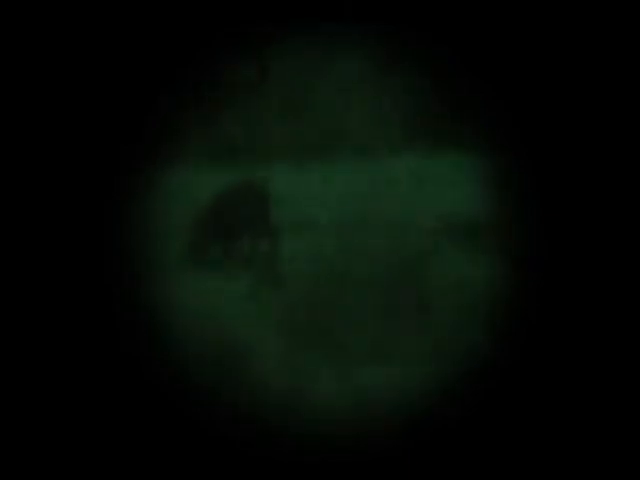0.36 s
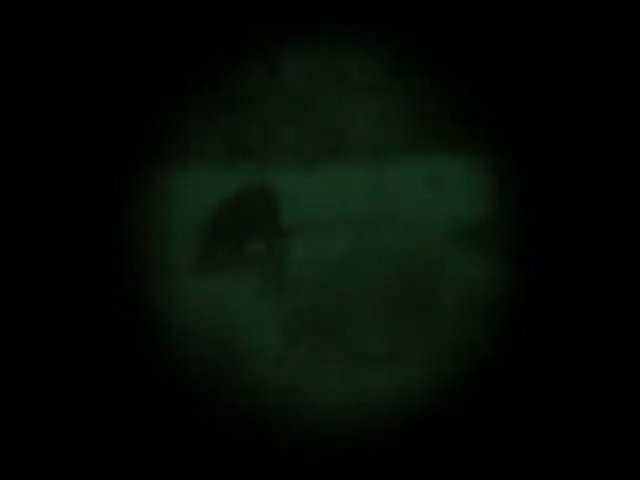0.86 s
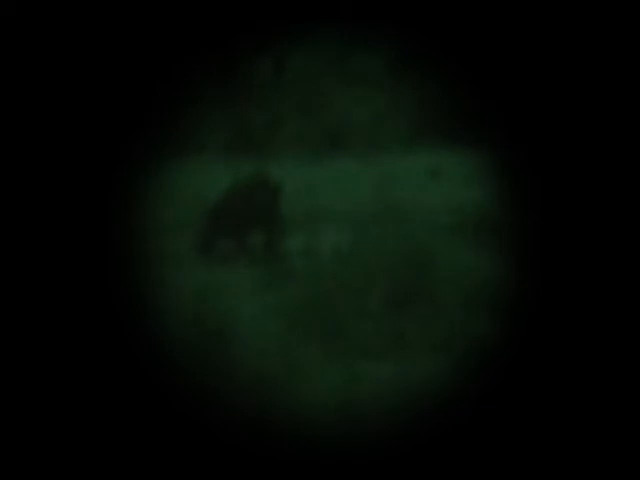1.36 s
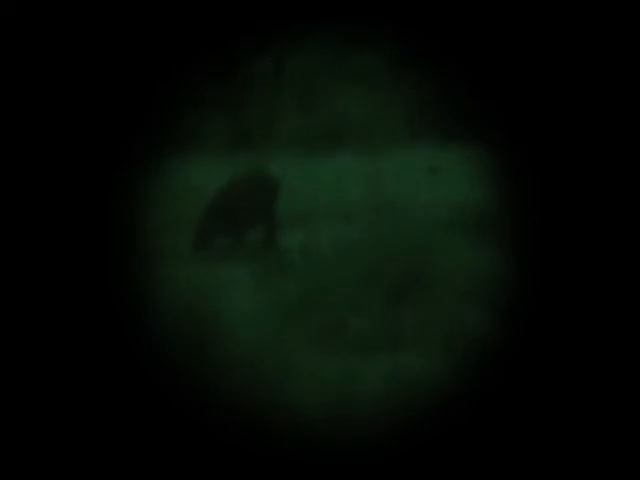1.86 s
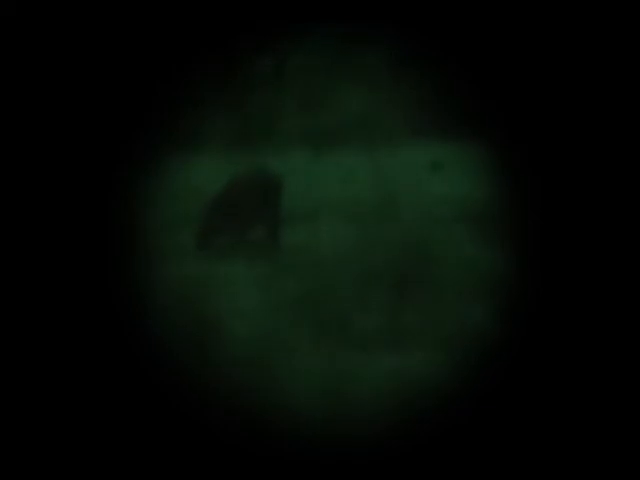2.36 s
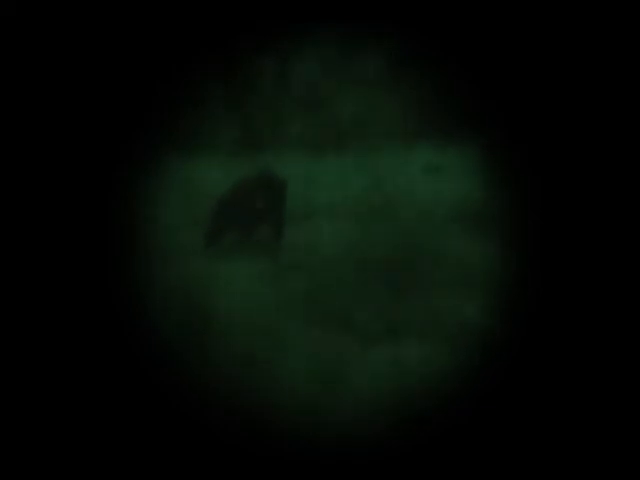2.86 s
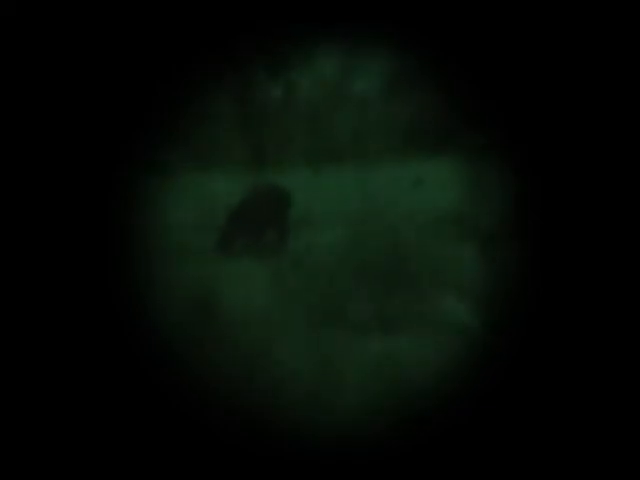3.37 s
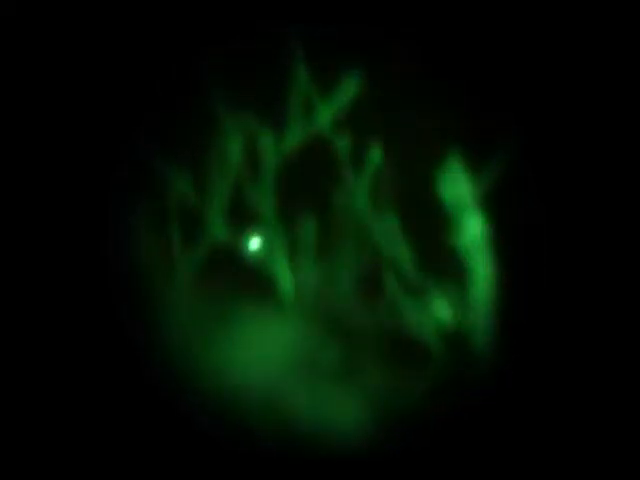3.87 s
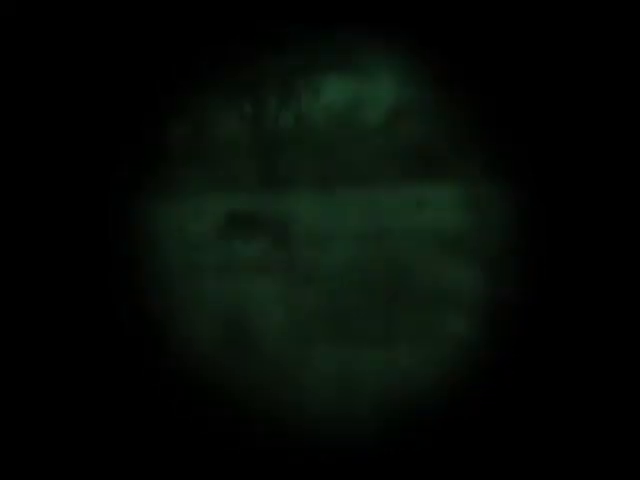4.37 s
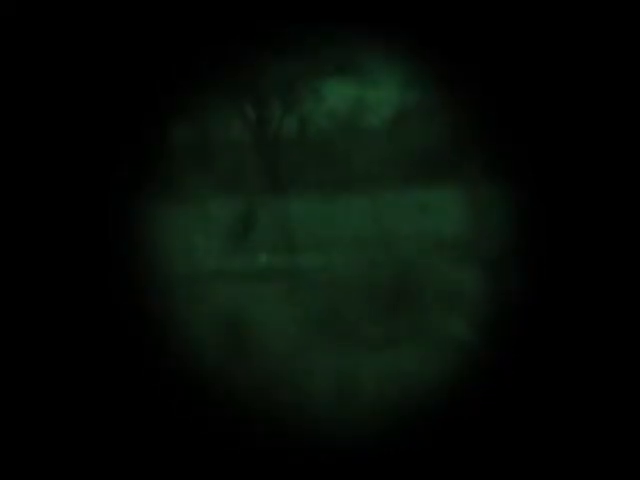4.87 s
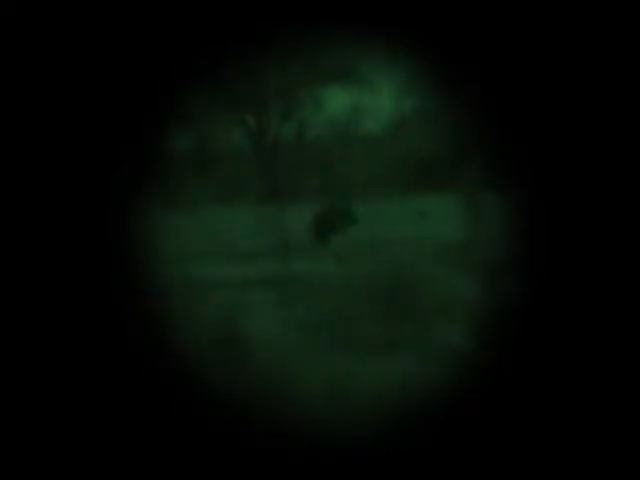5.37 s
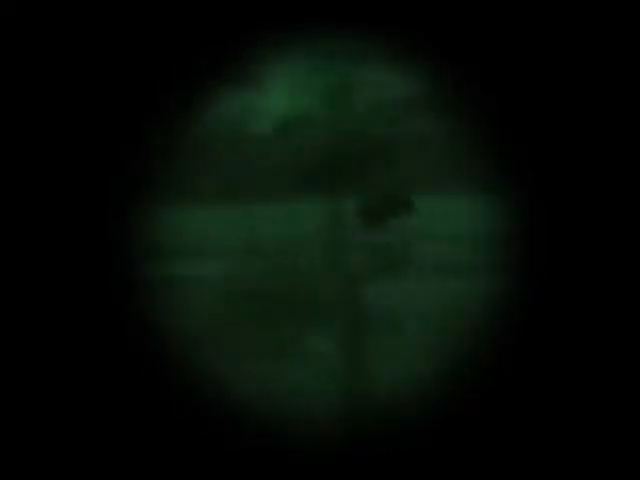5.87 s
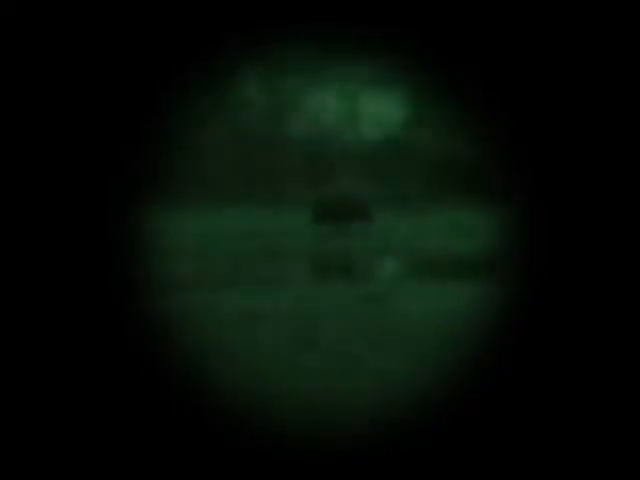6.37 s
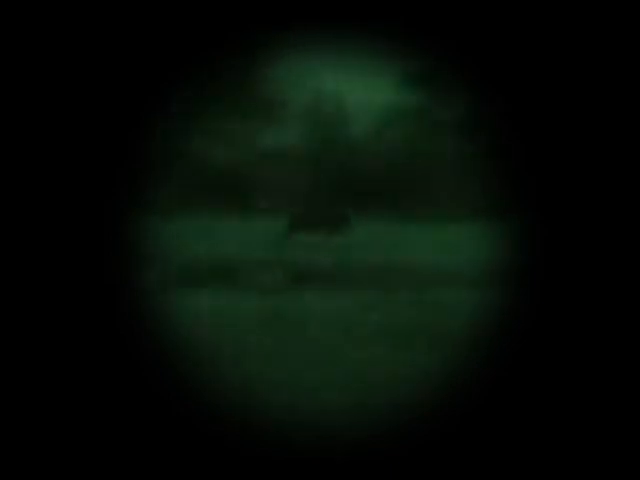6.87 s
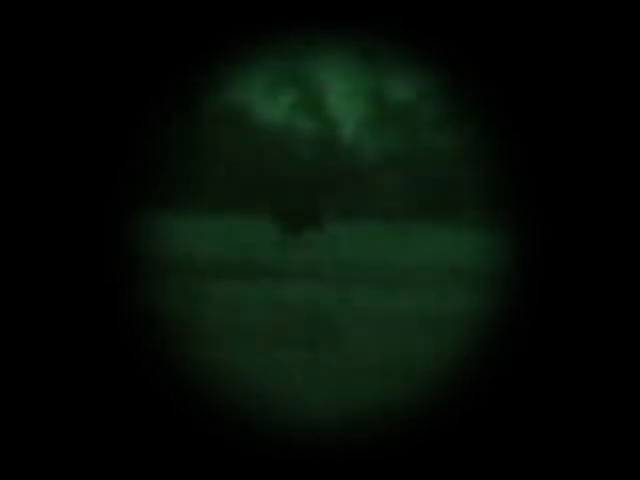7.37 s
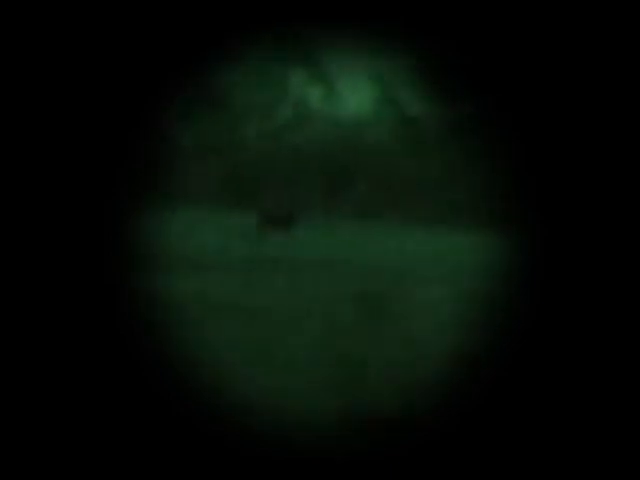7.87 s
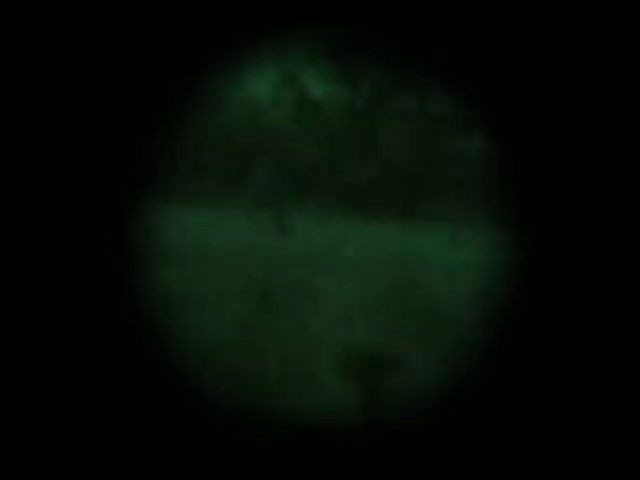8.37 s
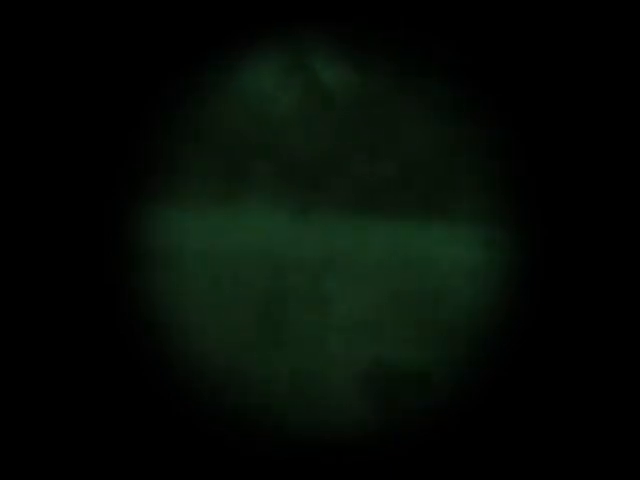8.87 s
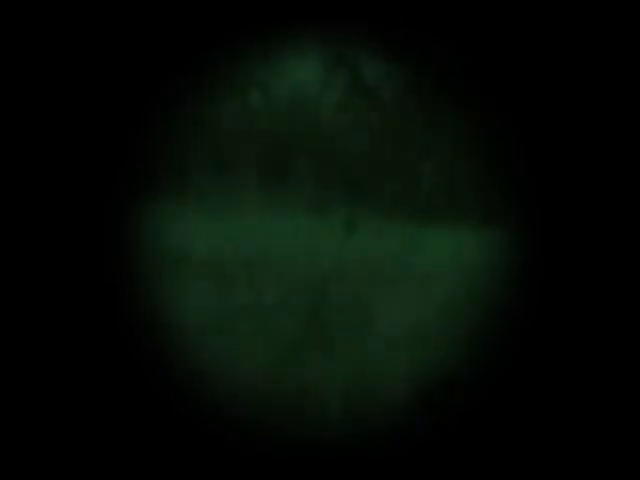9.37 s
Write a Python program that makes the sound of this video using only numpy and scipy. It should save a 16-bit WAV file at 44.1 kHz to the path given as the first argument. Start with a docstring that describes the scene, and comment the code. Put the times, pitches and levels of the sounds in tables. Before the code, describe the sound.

Outdoor field at night, heard on a hand-held stereo camera: faint hiss, chirping crickets, small plastic ticks of handling. At about 3.6 seconds a bow just to the right snaps loudly with a woody knock and brief rattle; a quarter second later the arrow smacks home. An animal bolts with quick rustles and thumps, fading within a second or so. Later come wind buffets, a hard click and a final scrape.

```python
"""Bow shot in a night field

A bow is loosed just right of a hand-held camera and the arrow lands a quarter second later: rung modes and air noise.
An animal bolts through the grass in bursts of grainy noise; two kinds of cricket sing in sagging tones.
The camera's shell ticks in the hand with short rung modes, and at the end a sleeve scrapes past and squeaks.
Wind buffets the two microphones as low noise, which also makes one hoof thud, over the steady hiss of the night."""
import sys
import numpy as np
from scipy import signal
from scipy.fft import rfft, irfft, next_fast_len
from scipy.io import wavfile
from scipy.ndimage import uniform_filter1d

SR = 44100
rng = np.random.default_rng(int(sys.argv[2]) if len(sys.argv) > 2 else 0)


def store_pcm(level_fs):
    """Save levels as 16-bit WAV."""
    pcm = np.round(np.clip(level_fs, -1, 1) * 32767).astype(np.int16)
    wavfile.write(sys.argv[1], SR, np.atleast_2d(pcm).T)


def amplitude_ratio(level_db):
    """Convert a level in decibels to the matching linear amplitude (field) ratio."""
    exponent = np.asarray(level_db, float) / 20
    return 10 ** exponent


N = 418509
TIME = np.arange(N) / SR
SIDES = np.array([[.5], [-.5]])  # shares a left-minus-right level between the two microphones


def curve(rows):
    """Columns of a timed table drawn out over all samples; silence outside it."""
    s, *columns = np.transpose(rows)
    return [np.interp(TIME, s, c, left=-120, right=-120) for c in columns]


def on_log(hz, rows):
    """A spectrum read on a log-frequency axis."""
    table_hz, value = np.array(rows)[:, :2].T
    return np.interp(np.log(hz), np.log(table_hz), value)


def colour(x, rows, pan=((1, 0), (2, 0)), alike=((1, 0), (2, 0))):
    """Shape two noises to a spectrum, balance and likeness; the mean of both sides gets rms 1."""
    size = next_fast_len(N)
    hz = np.maximum(np.arange(size // 2 + 1) * SR / size, 1)
    mid, side = rfft(x, size)
    likeness = np.clip(on_log(hz, alike), -.95, .95)
    pair = np.sqrt(1 + likeness) * mid + 2 * SIDES * np.sqrt(1 - likeness) * side
    gain = amplitude_ratio(on_log(hz, rows) + SIDES * on_log(hz, pan))
    y = irfft(pair * gain, size)[:, :N]
    return y / np.sqrt(np.mean(y.mean(0) ** 2))


def grit(spread_db, hold_s):
    """Two noises whose shared loudness varies from grain to grain, with smoothed steps."""
    hold = max(int(hold_s * SR), 1)
    grains = amplitude_ratio(spread_db * rng.standard_normal(N // hold + 1))
    loudness = uniform_filter1d(np.repeat(grains, hold), hold)[:N]
    return rng.standard_normal((2, N)) * loudness


def swells(times, peaks_db, rise_db_s, fall_db_s, under_db):
    """Gain of bursts that climb and die at steady dB rates, added in power to a level under them."""
    power = amplitude_ratio(2 * under_db)
    for s, db, up, down in np.broadcast(times, peaks_db, rise_db_s, fall_db_s):
        below_peak = np.where(TIME < s, up * (s - TIME), down * (TIME - s))
        power = power + amplitude_ratio(2 * (db - below_peak))
    return np.sqrt(power)


def add(out, s, sound):
    """Mix a sound in at a time."""
    i = min(max(int(s * SR), 0), N)
    out[:, i:i + sound.shape[1]] += sound[:, :N - i]


def ring(modes, scatter_db, twist, rise_s, centre_hz=500., slope_db=0.):
    """One blow at both microphones, peak 1: each hears the modes with its own strengths and phases."""
    hz, db, t60 = np.transpose(modes)[:, :, None]
    # the contact favours modes near its own pitch: slope_db is lost per octave away from it
    db = db - slope_db * np.abs(np.log2(hz / centre_hz))
    t = np.arange(int(t60.max() * SR) + 2) / SR
    pitch_luck, phase_luck, level_luck = rng.standard_normal((3, 2, len(modes), 1))
    detuned_hz = hz * (1 + 0.012 * pitch_luck[:1])  # the same at both microphones
    waves = np.sin(2 * np.pi * detuned_hz * t + twist * phase_luck)
    decay = 1000. ** (-t / t60)
    y = (amplitude_ratio(db + scatter_db * level_luck) * waves * decay).sum(1)
    y = y * (1 - np.exp(-t / rise_s))
    return y / np.abs(y).max(1, keepdims=True)


def blows(rows, crack, knock, twist, lag_s, rise_s, knock_left_db=0.):
    """A hard contact snaps and cracks; the body answers with a knock."""
    out = np.zeros((2, N))
    for s, crack_db, crack_hz, knock_db, knock_hz, pan in rows:
        # too short to have a pitch
        snap = [(crack_hz, 8., .002), (crack_hz * 1.44, 4., .002), (crack_hz / 1.49, 4., .004)]
        click = ring(crack + snap, 2.15, twist, 0.00019, crack_hz, slope_db=3.2)
        add(out, s, amplitude_ratio(crack_db + SIDES * pan) * click)
        thud = ring(knock, 3.5, twist / 2, rise_s, knock_hz, slope_db=9.)
        add(out, s + lag_s, amplitude_ratio(knock_db + SIDES * (pan + knock_left_db)) * thud)
    return out


# blows in the bow: start_s, crack_peak_db, crack_pitch_hz, knock_peak_db, knock_pitch_hz
BOW_BLOWS = [(3.631, -18.5, 4080, -52, 1010), (3.6368, -18.5, 2500, -35, 1050),
             (3.6417, -10.5, 4500, -34, 500), (3.6471, -16, 3900, -20.5, 420),
             (3.6498, -21, 2500, -20, 300), (3.7006, -39, 2700, -43, 400), (3.783, -48, 2500, -43, 640)]
# the slack cables rattle on: start_s, crack_peak_db
RATTLE = [(3.7142, -43), (3.7272, -35), (3.7402, -37), (3.7472, -34), (3.7603, -38), (3.7737, -46)]
# what the bow rings with, for cracks and for knocks: pitch_hz, level_db (relative), t60_s
BOW_CRACK = [(1710, -14, 0.014), (2200, -0.5, 0.016), (2490, -6, 0.033), (3060, -5.5, 0.017),
             (3610, -3, 0.018), (4200, -4, 0.014), (5120, 1, 0.012), (6230, -6.5, .018), (7500, -6.5, .012),
             (8780, -4.5, .015), (10800, -4.5, 0.014)]
BOW_KNOCK = [(160, 0, .1), (206, 9, 0.08), (250, 4, 0.065), (307, -5, .07), (385, 3, 0.1),
             (532, -13.5, 0.15), (700, 1, 0.07), (990, 9, 0.025), (1270, 10, 0.075), (1610, 0, .035),
             (2105, -2, .13)]


def bow():
    """Hard contacts in the bow crack and knock, then the slack cables rattle on its modes."""
    rattle = [(s, db, 2000, db - 18, 1800) for s, db in RATTLE]  # crack 2000 Hz, knock 1800 Hz
    rows = [row + (-6,) for row in BOW_BLOWS + rattle]  # 6 dB to the right
    return blows(rows, BOW_CRACK, BOW_KNOCK, twist=1.86, lag_s=-.0015, rise_s=0.0016, knock_left_db=-5.5)


def string_slap():
    """The string hits its stop with a whistle that shoots upward."""
    t = np.arange(int(.0028 * SR)) / SR
    pitch_hz = 3300 + 750000 * t + np.array([[300], [0]])  # left is 300 Hz higher
    turns = np.cumsum(pitch_hz).reshape(2, -1) / SR  # right carries on from the left's last phase
    whistle = np.sin(np.pi * t / t[-1]) * np.sin(2 * np.pi * turns)
    out = np.zeros((2, N))
    add(out, 3.641, amplitude_ratio(-13 + SIDES * -2) * whistle)
    return out


# air noise of the shot: time_s, level_db
SWISH = [(3.613, -53), (3.632, -36), (3.64, -40), (3.644, -27), (3.655, -31), (3.675, -44), (3.71, -51),
         (3.76, -55), (3.8, -65.5), (4.0, -64)]
# the arrow tears leaves: peak_s, level_db
THROUGH_LEAVES = [(3.945, -41.5)]
# its spectrum: pitch_hz, level_db (per Hz, relative)
SWISH_COLOUR = [(180, -22), (400, -12), (1240, -10), (2400, -12), (4900, -16), (8700, -16.5), (12500, -20),
                (14000, -66)]
# its balance: pitch_hz, left_minus_right_db
SWISH_PAN = [(60, -11.5), (110, -5), (200, -8), (360, -11), (650, 7), (1190, -16), (2160, -20),
             (3920, -10.5), (7130, -1.5), (13000, -3)]


def swish():
    """Rough air noise that carries the shot's tail and bursts where the arrow tears leaves."""
    tear_s, tear_db = np.transpose(THROUGH_LEAVES)
    gain = swells(tear_s, tear_db, 1200., 600., curve(SWISH)[0])
    return gain * colour(grit(2.1, 0.0023), SWISH_COLOUR, SWISH_PAN)


# blows of the arrow landing: start_s, crack_peak_db, crack_pitch_hz, knock_peak_db, knock_pitch_hz
ARROW_BLOWS = [(3.9174, -23, 7500, -31, 704), (3.9319, -32, 3280, -22, 270),
               (3.9416, -27.5, 3620, -32, 400)]
# what the landing rings with, for cracks and for knocks: pitch_hz, level_db (relative), t60_s
ARROW_CRACK = [(1910, 2, 0.017), (2500, -5, 0.017), (3180, -2, 0.014), (4000, -2, .011), (5600, -2, 0.009),
               (7200, 2, 0.0041), (9700, 6, 0.0077), (11500, -8, 0.0057)]
ARROW_KNOCK = [(191, -12, 0.11), (270, 1.5, 0.049), (380, -3.5, 0.022), (566, -6, 0.028), (790, 2.5, 0.021),
               (1303, 1.5, 0.037)]


def arrow_landing():
    """The arrow lands in a few hard blows, each a bright crack with a short knock."""
    rows = [row + (-4,) for row in ARROW_BLOWS]  # 4 dB to the right
    return blows(rows, ARROW_CRACK, ARROW_KNOCK, twist=0.42, lag_s=0., rise_s=0.00054)


# the animal's steady brushing: time_s, stalks_db, hooves_db
BOLT = [(3.99, -65, -66), (4.15, -61, -59.5), (4.56, -61, -62.5), (4.62, -63, -72), (4.75, -59, -69),
        (4.95, -64.5, -74), (5.15, -65, -72), (5.3, -75, -75), (5.5, -77, -72)]
# its bounds in the grass: peak_s, stalks_db, hooves_db, hollow_ring_db
BOUNDS = [(4.065, -62, -60, -70), (4.1, -57, -54, -52), (4.124, -57, -56, -51), (4.15, -58, -58, -59),
          (4.21, -60, -60, -55), (4.257, -63, -51, -60), (4.295, -61, -51, -58), (4.34, -64, -57, -68),
          (4.452, -49, -50, -56), (4.49, -55.5, -59.5, -66), (4.53, -58, -56, -68), (4.84, -62, -62, -70),
          (5.04, -68, -70, -75)]
# spectra of stalks, hooves and the narrow ring in the thumps: pitch_hz, level_db (per Hz, relative)
STALKS = [(700, -23), (1200, -4), (2000, -4), (3200, -5.5), (5000, -11.5), (8000, -17), (12500, -24),
          (14000, -57)]
HOOVES = [(120, -9), (250, 2), (420, 1), (600, -2), (950, -5), (1300, -9), (2000, -30)]
HOLLOW = [(700, -30), (900, -4), (980, 0), (1080, -4), (1400, -30)]
# balance of the animal: pitch_hz, left_minus_right_db
BOLT_PAN = [(150, -15.5), (400, -9), (1200, -5), (7000, -3)]
# dry stalks snap: start_s, peak_db
TWIGS = [(4.0615, -49), (4.1465, -49), (4.188, -41), (4.443, -43), (4.516, -47)]
# what a snapping stalk rings with: pitch_hz, level_db (relative), t60_s
TWIG = [(2000, -6, .012), (2700, 0, .02), (3170, 0, .02), (4600, -5, .01), (7000, -8, .006)]


def bolt():
    """Stalks crackle finely and snap, hooves thump in coarser lumps with a hollow ring; bounds burst in all."""
    s, *peaks_db = np.transpose(BOUNDS)
    stalks_db, hooves_db = curve(BOLT)
    unders_db = (stalks_db, hooves_db, hooves_db - 7.)
    stalks, hooves, hollow = (swells(s, db, 600, 300, under) for db, under in zip(peaks_db, unders_db))
    out = stalks * colour(grit(3.8, .002), STALKS, BOLT_PAN, NIGHT_ALIKE)
    out = out + hooves * colour(grit(4.5, .01), HOOVES, BOLT_PAN, NIGHT_ALIKE)
    out = out + hollow * colour(grit(3., .008), HOLLOW, BOLT_PAN, NIGHT_ALIKE)
    for when, db in TWIGS:
        add(out, when, amplitude_ratio(db + SIDES * -4) * ring(TWIG, 3., .6, .0004))
    return out


# the shell ticks in the hand: start_s, crack_peak_db, crack_pitch_hz, knock_peak_db, left_minus_right_db
SHELL_TICKS = [(0.116, -57, 3400, -41, 0), (0.35, -63, 4200, -47, 3), (0.7056, -60, 3900, -42, 3),
               (1.057, -64, 3700, -48.5, -2.5), (1.5942, -31, 7000, -32.5, -1),
               (1.671, -21, 8000, -63, 1.5), (1.779, -36, 6570, -60, -4.5), (2.069, -59, 3400, -44, 5),
               (2.5476, -64, 4560, -50.5, 8), (2.808, -64, 4000, -50, 3), (1.225, -64, 4000, -52, 1.5),
               (1.971, -64, 4000, -51, 4), (3.283, -64, 4000, -52, 3), (0.8, -64, 4000, -50, 3),
               (5.8652, -35.5, 6550, -48, 2), (5.9606, -40.5, 6440, -66, 0.4), (6.0932, -45, 8500, -57, 4),
               (6.2385, -50, 8000, -66, 0), (6.333, -47, 9000, -66, -1.5), (6.3625, -50, 8000, -66, -2),
               (6.4325, -43, 6100, -63, 0.2), (6.6194, -38.5, 2400, -43, -9), (6.8771, -43, 8040, -65, 0),
               (7.093, -49, 8000, -65, 0), (7.2622, -58, 3610, -48, -2), (7.4048, -57, 3200, -46, -1),
               (7.551, -15.5, 8500, -23, 2.5), (7.7866, -31.5, 6700, -33.5, 0),
               (8.1903, -56, 3700, -46, 7.9), (8.329, -54, 3800, -46, 0), (8.4267, -42, 2760, -36, 0),
               (8.5374, -63, 4000, -49, -1), (9.1563, -24.5, 6300, -29.5, -1.5),
               (9.2383, -32, 4940, -45, -3.8), (9.2886, -33, 5000, -58, -2), (9.3245, -36, 3100, -58, -2),
               (9.3456, -37, 7000, -33, -4.5), (9.4302, -40, 6400, -54.3, 0)]
# what the shell rings with, for cracks and for knocks: pitch_hz, level_db (relative), t60_s
SHELL_CRACK = [(2200, -5, 0.011), (2920, -6, 0.013), (3500, -9, 0.012), (3880, -10, 0.01),
               (4600, -10, 0.01), (7850, -2, 0.007), (8200, -6, 0.01), (9700, -3.5, 0.01),
               (11570, -8, 0.0077)]
SHELL_KNOCK = [(249, -3, 0.025), (347, -2, 0.022), (455, -1, 0.024), (601, 5, 0.013), (758, 4.5, 0.017),
               (1050, 1.5, 0.021), (1394, 1, 0.018), (1820, 2, 0.016)]


def shell_ticks():
    """The shell cracks and knocks; the harder the crack against the knock, the higher the knock."""
    rows = []
    for s, crack_db, crack_hz, knock_db, pan in SHELL_TICKS:
        knock_hz = 640 * 2 ** (.035 * (crack_db - knock_db))  # octaves per dB
        rows.append((s, crack_db, crack_hz, knock_db, knock_hz, pan))
    return blows(rows, SHELL_CRACK, SHELL_KNOCK, twist=1.0, lag_s=0.00046, rise_s=0.0011)


def fumbling(count):
    """Fingers shift on the shell: soft knocks at random moments."""
    out = np.zeros((2, N))
    for when, size, side in rng.random((count, 3)):
        gain = amplitude_ratio(-58.5 + 7.0 * size + SIDES * 12 * (side - 0.33))
        add(out, when * N / SR, gain * ring(SHELL_KNOCK, 4.6, 0.88, 0.0023, 366.0, slope_db=13.0))
    return out


# the drag: time_s, scrape_db, low_squeak_db
SLEEVE = [(9.19, -72, -67), (9.25, -62, -58), (9.37, -62, -56), (9.43, -61, -66), (9.5, -58, -60)]
# the cloth catches: peak_s, scrape_db, low_squeak_db, high_squeak_db
CATCHES = [(9.239, -47, -49, -46), (9.289, -53, -56, -57), (9.318, -55, -50, -62), (9.325, -57, -42, -56),
           (9.342, -58, -55, -65), (9.367, -60, -54, -53), (9.388, -58, -64, -62)]
# spectrum of the scrape: pitch_hz, level_db (per Hz, relative)
SLEEVE_SCRAPE = [(1500, -20), (2500, -8), (4900, -3), (7000, -4), (9000, -14), (12500, -28), (14000, -50)]
# squeaks, a low pair then a high pair: pitch_hz, width_hz (of one filter pass), level_db (within the pair)
SLEEVE_RINGS = [(2890, 430, 1), (3260, 350, 2.5), (4500, 300, -8), (4860, 230, -4)]


def sleeve():
    """Stiff cloth scrapes broadly; where it catches, it squeaks in a low and a high pair of narrow rings."""
    s, *peaks_db = np.transpose(CATCHES)
    scrape_db, squeak_db = curve(SLEEVE)
    unders_db = (scrape_db, squeak_db, squeak_db - 9.)
    scrape_gain, *squeak_gains = (swells(s, db, 5000, 500, under) for db, under in zip(peaks_db, unders_db))
    slips = grit(2.4, .003)
    out = scrape_gain * colour(grit(3., 0.002), SLEEVE_SCRAPE)
    for gain, pair in zip(squeak_gains, np.reshape(SLEEVE_RINGS, (2, 2, -1))):
        squeak = 0
        for hz, width, db in pair:
            b, a = signal.iirpeak(hz, hz / width, SR)
            once = signal.lfilter(b, a, slips)
            squeak = squeak + amplitude_ratio(db) * signal.lfilter(b, a, once)
        out = out + gain * squeak / np.sqrt(np.mean(squeak.mean(0) ** 2))
    return amplitude_ratio(SIDES * -3) * out


def stroke(hz, fall_hz, length_s, rough):
    """One wing stroke: a tone that sags as the wing slows, blurred by the grass."""
    u = np.linspace(0, 1, int(length_s * SR))
    blur = uniform_filter1d(rng.standard_normal((2, len(u))), 90) * np.sqrt(90) * rough
    phase = 2 * np.pi * np.cumsum(hz + fall_hz * (.3 - u ** 2)) / SR
    right_shift = 1.6 * rng.random((2, 1)) * [[0], [1]]
    return np.sin(np.pi * u) * (1 + blur) * np.sin(phase + right_shift + blur[::-1])


# two-stroke chirps: start_s (of the first stroke, 0.02 s late), gap_s, level_db, pitch_hz
LOW_CRICKETS = [(0.19, 0.053, -58, 3880), (0.364, .06, -69, 4000), (0.64, .058, -64.5, 3740),
                (0.794, .057, -66, 3970), (1.093, .046, -60.5, 3920), (1.193, 0.065, -64.5, 3860),
                (1.385, .058, -65, 3800), (1.3, .05, -66, 3950), (3.176, .11, -65, 4050),
                (1.918, .046, -56.5, 3900), (2.285, .05, -68, 3760), (2.377, 0.052, -62, 4080),
                (2.717, 0.061, -64.5, 3830), (3.026, 0.058, -63, 3880), (3.228, .062, -65, 3820),
                (3.463, .058, -61.5, 3820), (4.24, .06, -62, 3950), (4.639, .04, -60, 4000),
                (4.84, .06, -62, 3900), (5.042, .055, -65, 3850), (5.242, .057, -58.5, 4010),
                (5.518, .043, -55.5, 4000), (5.712, 0.065, -60, 3790), (5.958, 0.054, -65, 3940),
                (6.293, .059, -65, 3740), (6.466, .063, -55.5, 3830), (6.579, .046, -61, 3970),
                (6.745, .06, -61.5, 3900), (6.971, .06, -69, 3800), (7.45, .06, -54, 3765),
                (7.564, .052, -62.5, 3800), (7.93, .058, -65, 3960), (8.157, 0.045, -63, 3930),
                (8.269, .061, -54, 3780), (8.385, .058, -68, 4020), (0.905, .06, -68, 3980),
                (8.635, .05, -66, 3950), (8.045, .057, -64, 3900), (7.33, .055, -65, 3960),
                (6.85, .055, -67, 3900), (8.722, 0.053, -61.5, 3910), (9.09, .056, -57, 3770)]


def low_crickets(count):
    """Slow two-stroke chirps near 4 kHz over a fainter chorus at random moments."""
    out = np.zeros((2, N))
    for s, gap, db, hz in LOW_CRICKETS:
        pan = -3 - 4 * (hz < 3830) * (s > 6)  # the deeper singer ends up further right
        for k in range(2):  # the second stroke is 1 dB louder
            add(out, s + k * gap - .02, amplitude_ratio(db + k + SIDES * pan) * stroke(hz, 493.0, .037, rough=0.38))
    for when, pitch, size in rng.random((count, 3)):
        gain = amplitude_ratio(-75 + 5. * size + SIDES * -6)
        for k in range(2):
            chirp = stroke(3750 + 300 * pitch, 375.0, .04, rough=0.51)
            add(out, when * N / SR + .055 * k, gain * chirp)
    return out


# trills: middle_s
HIGH_CRICKET = [0.067, 0.364, 0.686, 0.954, 1.238, 1.56, 1.882, 2.161, 2.487, 2.765, 3.085, 3.381, 5.12,
                5.499, 5.8, 6.09, 6.38, 6.653, 6.9, 7.195, 7.46, 7.69, 7.96, 8.257, 8.563, 8.856, 9.12]
# how the trills change as the camera swings: time_s, level_db, left_minus_right_db, pitch_hz, trill_length_s
HIGH_CRICKET_PAN = [(0, -69.5, -5, 5220, .1), (5.5, -70, -5, 5240, .09), (6.5, -70, -5, 5260, .1),
                    (7.2, -72, 0, 5300, .12), (7.8, -68.5, 3, 5330, .17), (9.49, -70, -1, 5330, .17)]


def high_cricket():
    """Quick trills of strokes that swell and fade above 5 kHz."""
    out = np.zeros((2, N))
    swing_s, *swing = np.transpose(HIGH_CRICKET_PAN)
    for s in HIGH_CRICKET:
        db, pan, hz, length = (np.interp(s, swing_s, c) for c in swing)
        for late in .021 * np.arange(-4, 5):
            swell = np.cos(np.pi * np.clip(late / length, -.5, .5)) ** .5
            start = s + late - .009 + .002 * rng.standard_normal()
            add(out, start, amplitude_ratio(db + SIDES * pan) * swell * stroke(hz, 350., .02, rough=.62))
    return out


def bushes(chirps):
    """The bushes scatter the chirps back as a decaying noise echo, 5 dB down."""
    t60_s = .2
    t = np.arange(int(t60_s * SR)) / SR
    echo = rng.standard_normal((2, len(t))) * 1000. ** (-t / t60_s)
    echo = echo / np.sqrt((echo ** 2).sum(1, keepdims=True))
    return amplitude_ratio(-5) * signal.fftconvolve(chirps, echo, axes=1)[:, :N]


# the breeze between gusts: time_s, level_db
WIND = [(0.0, -76.5), (3.55, -77), (4.0, -74), (7.7, -74), (8.0, -66.5), (9.49, -66)]
# gusts, but the row at 4.53 s is a hoof thud, the low thud of the animal's bound:
# peak_s, peak_db, ten_db_s (time to climb or to die 10 dB)
GUSTS_AND_HOOF_THUD = [(2.69, -61, .05), (4.0, -69, 0.2), (4.53, -56, .02), (4.58, -64, .06),
                       (5.67, -67, .07), (5.87, -60, .1), (6.38, -56.5, 0.09), (6.64, -56, 0.1),
                       (7.42, -68, .05), (7.52, -67, .07), (7.79, -64, 0.04), (8.0, -58, .08),
                       (8.11, -56, .06), (8.19, -50, .04), (8.235, -49, .04), (8.35, -60, .08),
                       (8.56, -50, .06), (8.63, -55, .05), (8.72, -55, .06), (8.98, -52, .04),
                       (9.345, -46, .04), (9.48, -46, .04)]
# spectrum of this low noise: pitch_hz, level_db (per Hz, relative)
BUFFET = [(8.8, -48), (15, -11.5), (75, 4.5), (219, -10.5), (400, -19.5), (520, -42), (880, -120)]


def wind_and_hoof_thud():
    """Low noise, apart at each microphone: calm air on the right, strong gusts and one hoof thud on both."""
    bursts = np.array(GUSTS_AND_HOOF_THUD)
    is_thud = bursts[:, 0] == 4.53
    gusts, hoof_thud = bursts[~is_thud], bursts[is_thud]
    gain = curve(WIND)[0]
    s, peak_db, ten_db_s = gusts.T
    wind_gain = swells(s, peak_db, 10 / ten_db_s, 10 / ten_db_s, gain)
    s, peak_db, ten_db_s = hoof_thud.T
    gain = swells(s, peak_db, 10 / ten_db_s, 10 / ten_db_s, 20 * np.log10(wind_gain))
    pan_db = np.interp(20 * np.log10(gain), [-75, -58], [-10, 1])
    return gain * amplitude_ratio(SIDES * pan_db) * colour(grit(1.8, .03), BUFFET)


# spectrum of the night: pitch_hz, level_db (per Hz, relative)
NIGHT = [(59, -31), (100, -16.5), (166, -3.5), (376, 0.5), (433, -0.5), (625, -2), (1330, -7), (3060, -14),
         (3910, -12), (4600, -16.5), (11300, -21), (12200, -21.5), (13000, -42)]
# its balance: pitch_hz, left_minus_right_db
NIGHT_PAN = [(60, -29), (110, -9.5), (200, -1), (360, 2.5), (650, 5), (1190, 5.5), (2160, 4), (3920, 1),
             (7130, 2), (13000, -7)]
# likeness of left and right, shared with the animal: pitch_hz, likeness (0-1, no unit)
NIGHT_ALIKE = [(60, 0.1), (130, 1), (280, 0.13), (600, 0.42), (1290, 0.46), (2790, 0.46), (6010, 0.28),
               (13000, 0.18)]


def night():
    """The steady hiss of far leaves, insects and the microphones themselves."""
    return amplitude_ratio(-62.5) * colour(grit(1., .01), NIGHT, NIGHT_PAN, NIGHT_ALIKE)


def scene():
    """All sources at the two microphones."""
    air = signal.butter(2, 110, "highpass", fs=SR, output="sos")  # small things radiate no deep bass
    shell = signal.butter(3, 230, "highpass", fs=SR, output="sos")  # the shell is smaller still
    shot = bow() + string_slap() + swish()
    hand = shell_ticks() + fumbling(count=20) + sleeve()
    chirps = low_crickets(count=60) + high_cricket()
    struck = signal.sosfilt(air, shot + arrow_landing()) + signal.sosfilt(shell, hand)
    return struck + bolt() + chirps + bushes(chirps) + wind_and_hoof_thud() + night()


def roll_off(x):
    """The treble ends steeply here."""
    return signal.sosfilt(signal.butter(12, 12920, fs=SR, output="sos"), x)


def record(dry):
    """The camera cuts the top with a steep lowpass."""
    top = signal.cheby2(16, 50, 13250, fs=SR, output="sos")
    mix = signal.sosfilt(top, dry)
    return roll_off(mix)


dry = scene()
out = record(dry)
store_pcm(out)
```